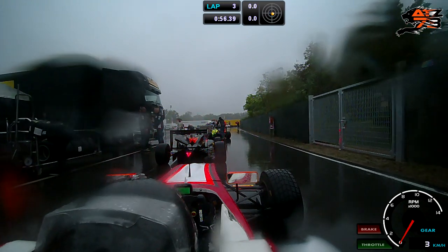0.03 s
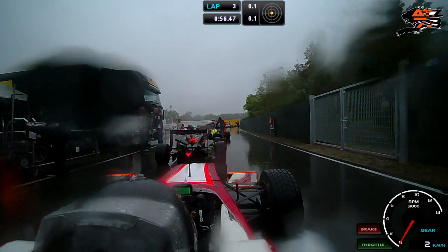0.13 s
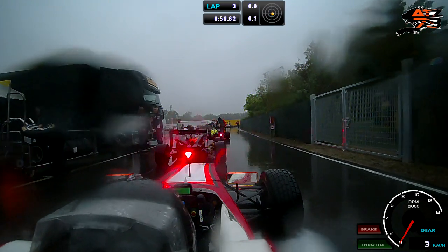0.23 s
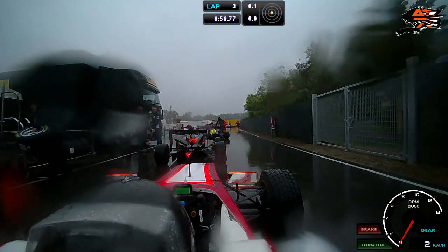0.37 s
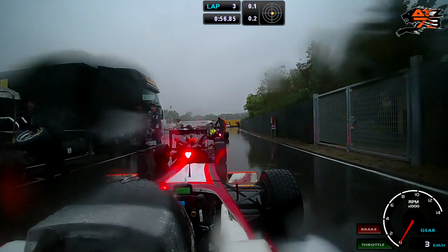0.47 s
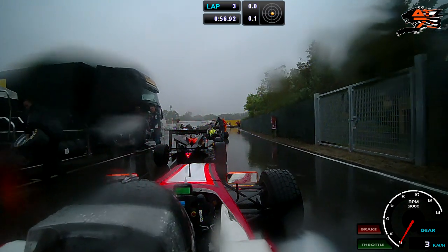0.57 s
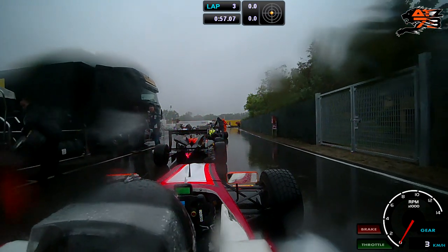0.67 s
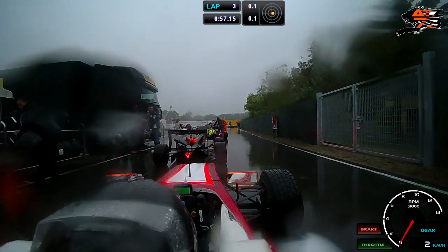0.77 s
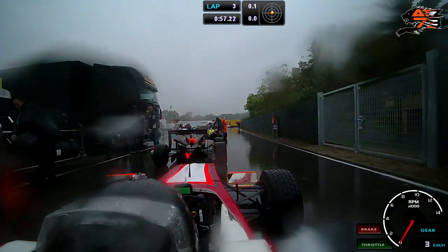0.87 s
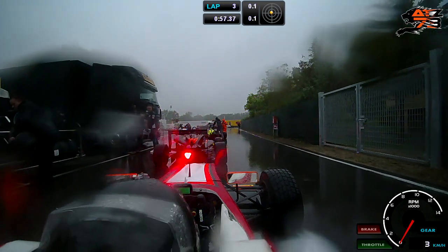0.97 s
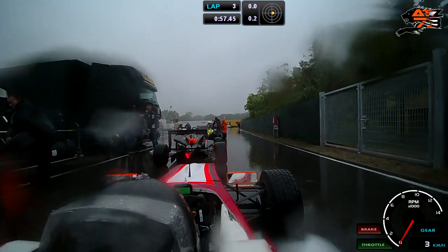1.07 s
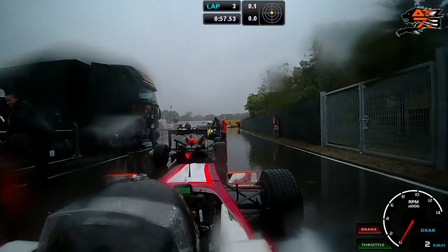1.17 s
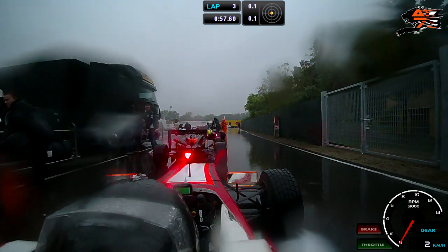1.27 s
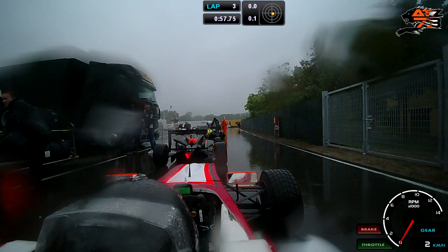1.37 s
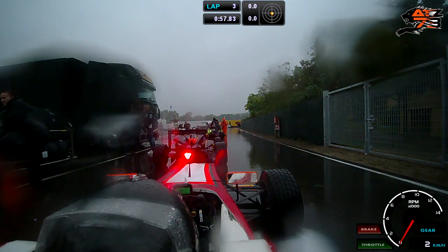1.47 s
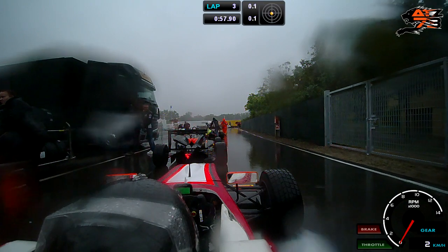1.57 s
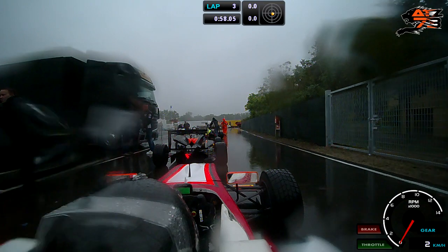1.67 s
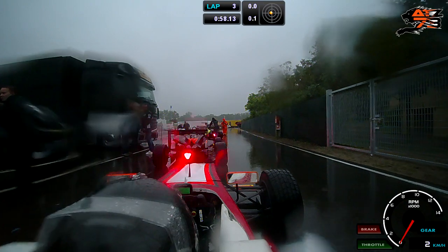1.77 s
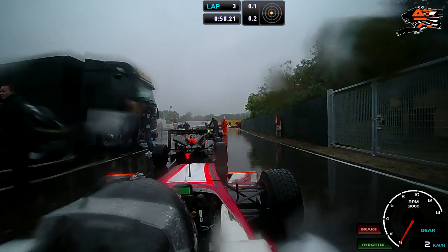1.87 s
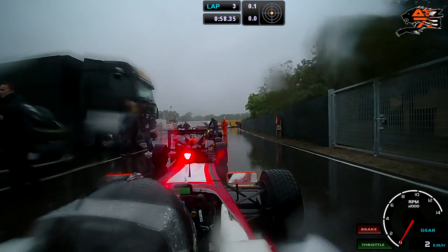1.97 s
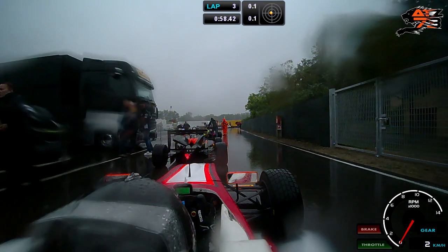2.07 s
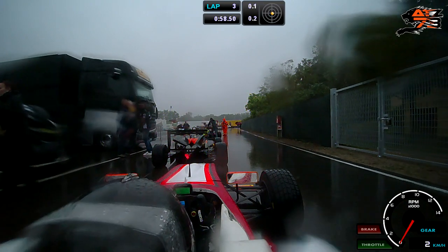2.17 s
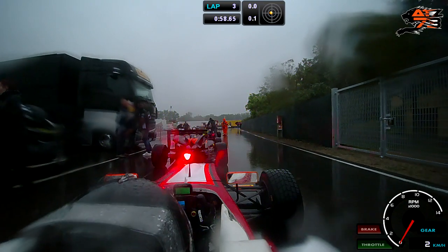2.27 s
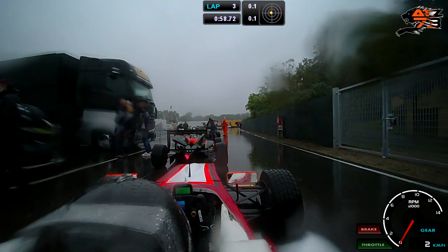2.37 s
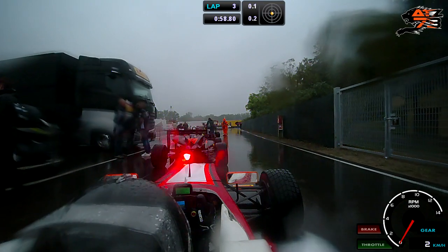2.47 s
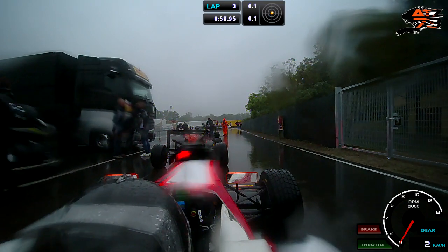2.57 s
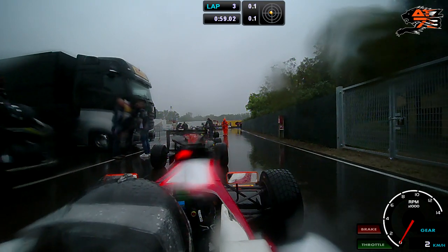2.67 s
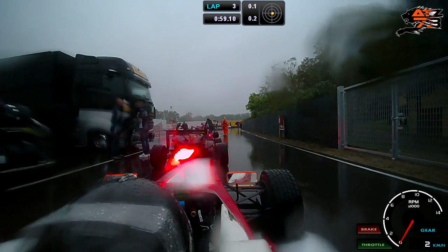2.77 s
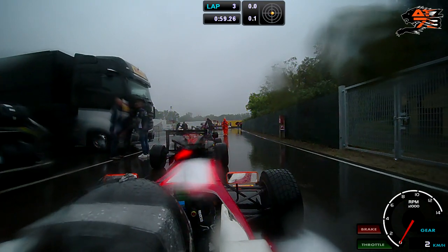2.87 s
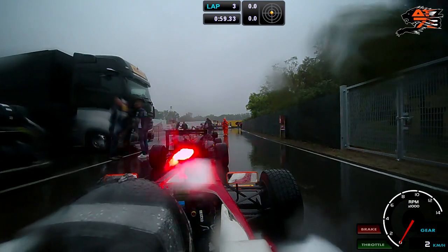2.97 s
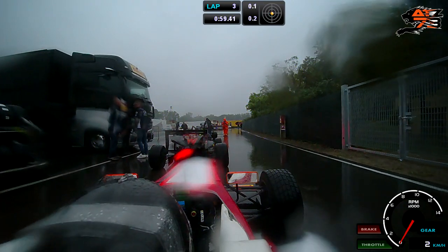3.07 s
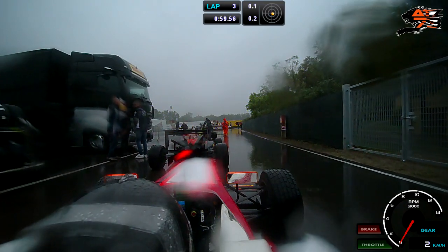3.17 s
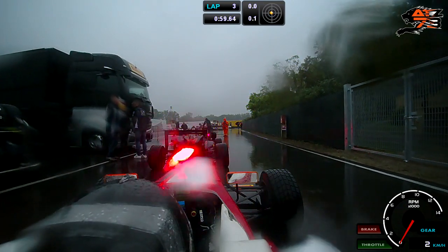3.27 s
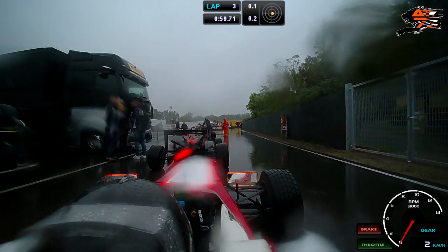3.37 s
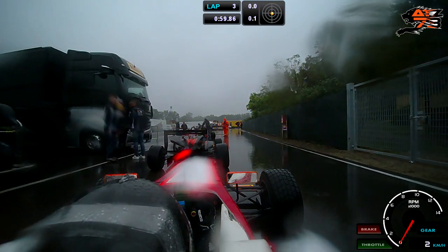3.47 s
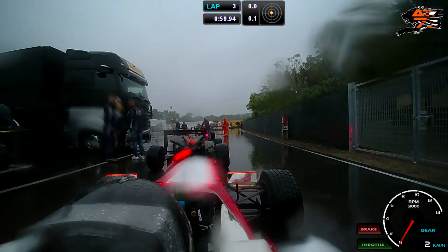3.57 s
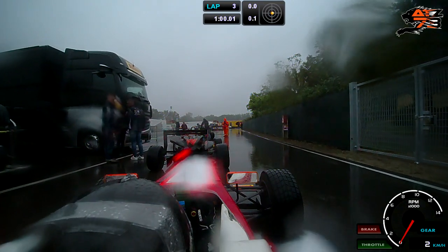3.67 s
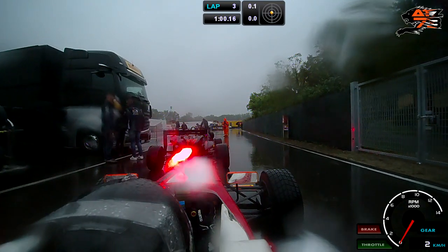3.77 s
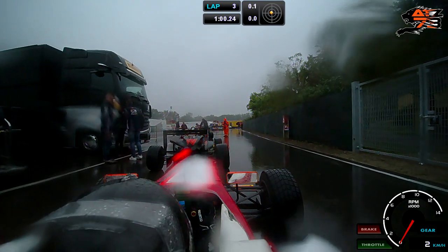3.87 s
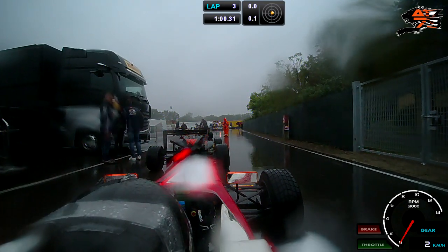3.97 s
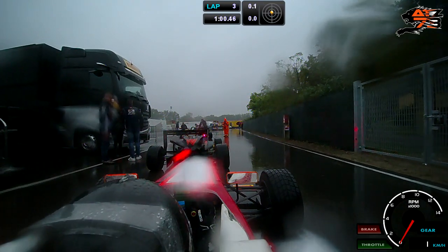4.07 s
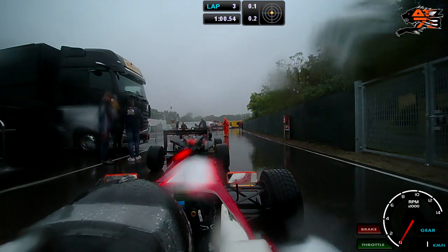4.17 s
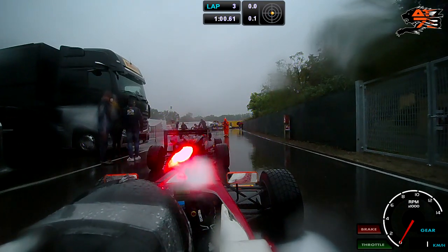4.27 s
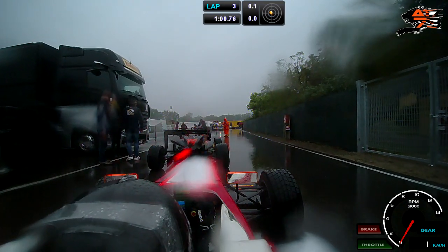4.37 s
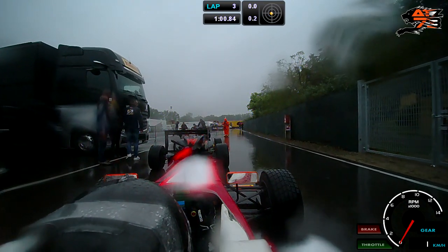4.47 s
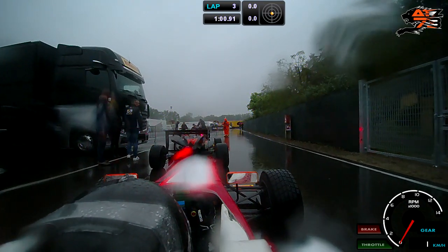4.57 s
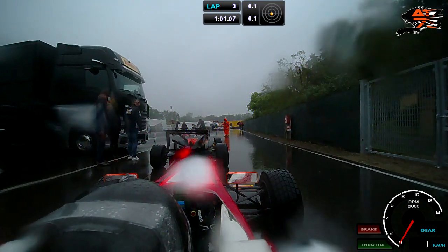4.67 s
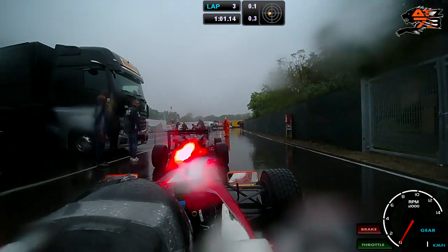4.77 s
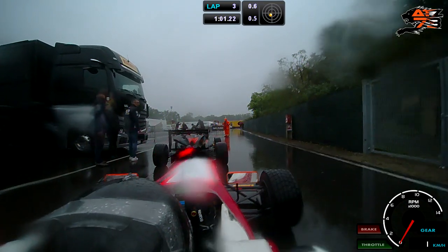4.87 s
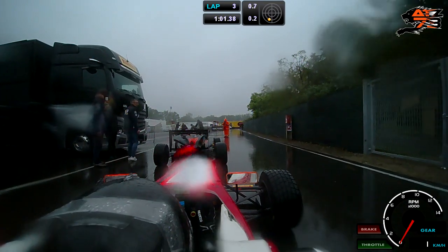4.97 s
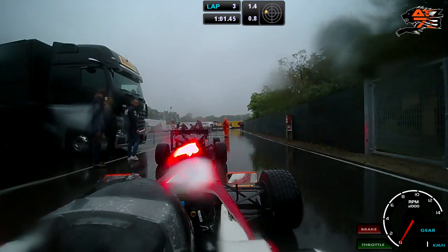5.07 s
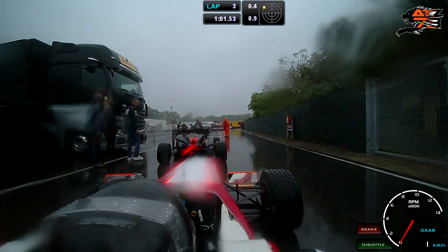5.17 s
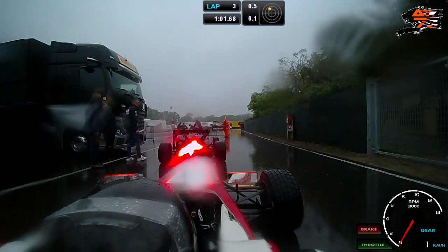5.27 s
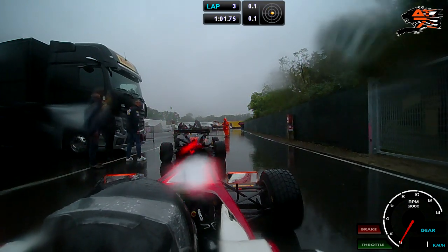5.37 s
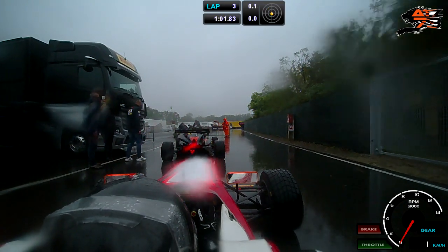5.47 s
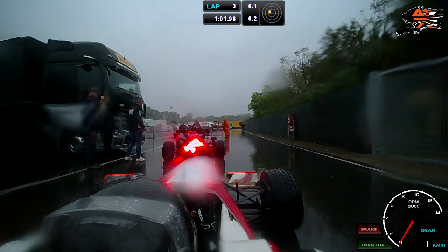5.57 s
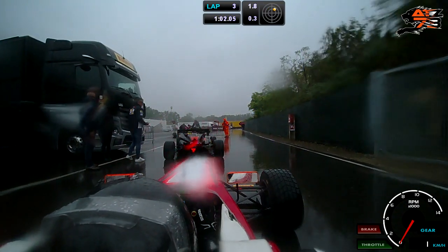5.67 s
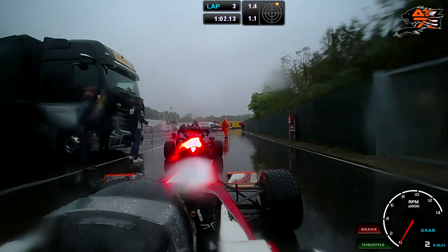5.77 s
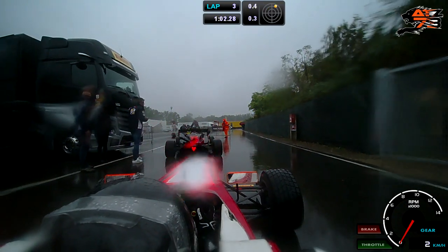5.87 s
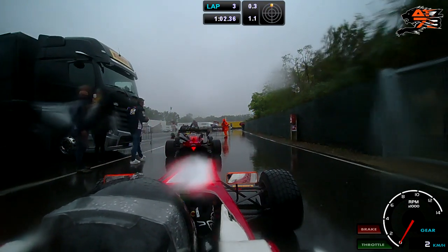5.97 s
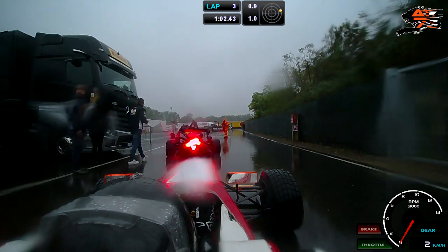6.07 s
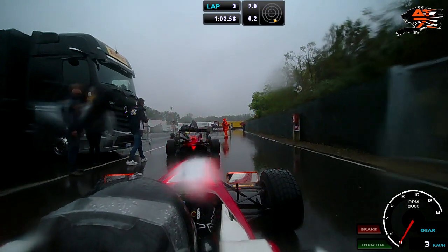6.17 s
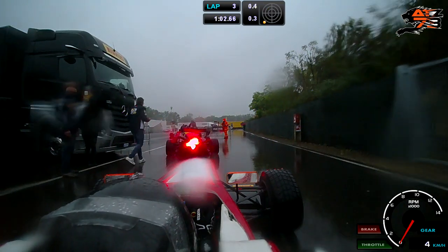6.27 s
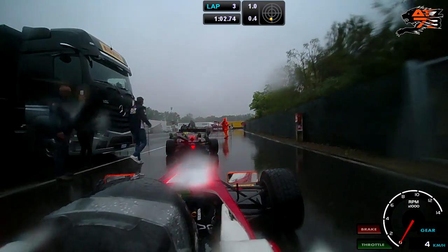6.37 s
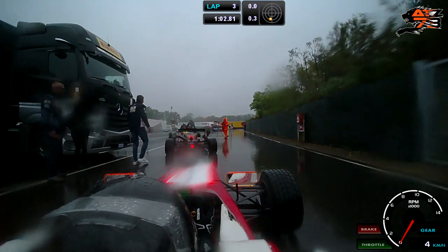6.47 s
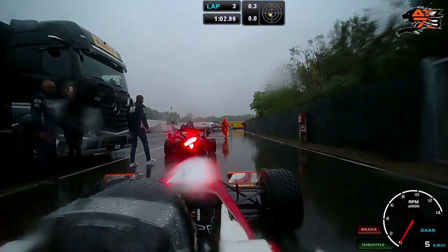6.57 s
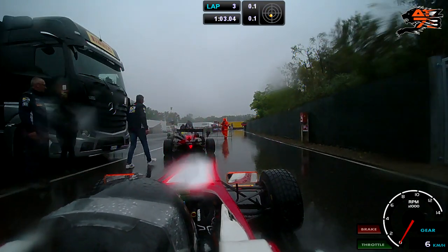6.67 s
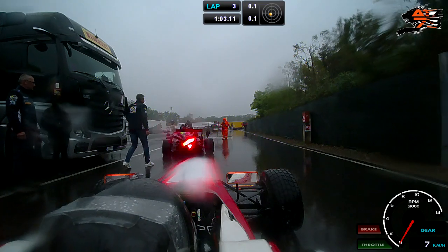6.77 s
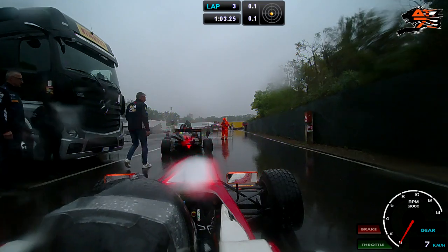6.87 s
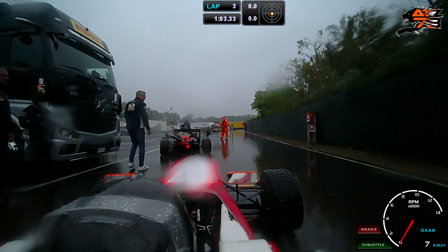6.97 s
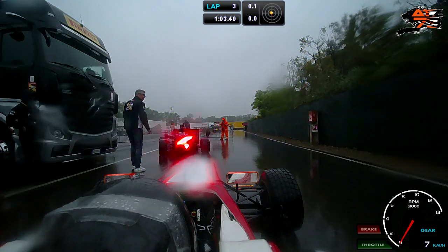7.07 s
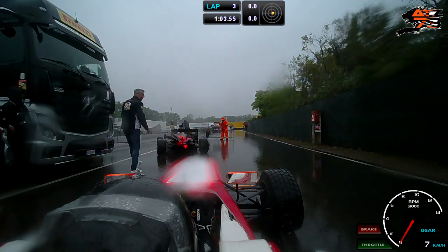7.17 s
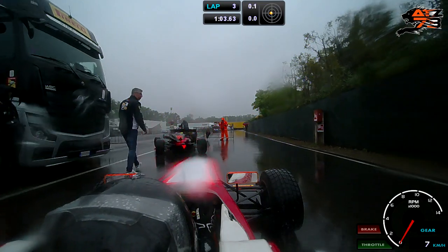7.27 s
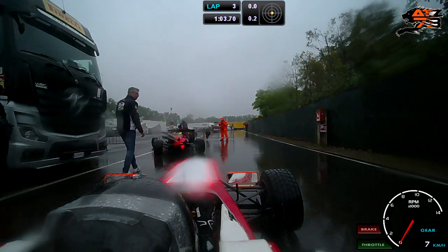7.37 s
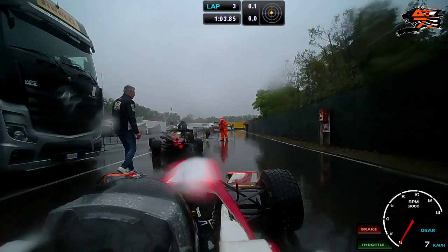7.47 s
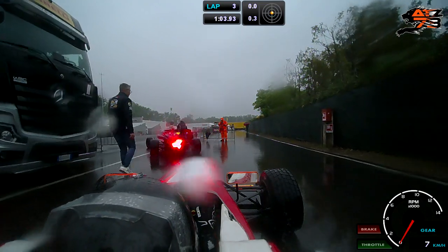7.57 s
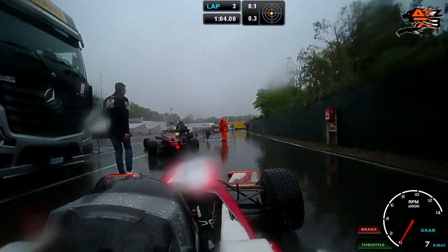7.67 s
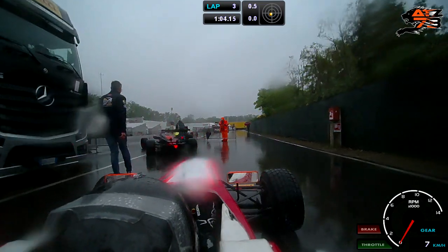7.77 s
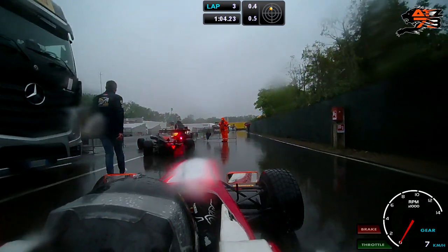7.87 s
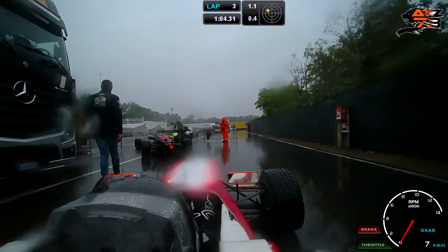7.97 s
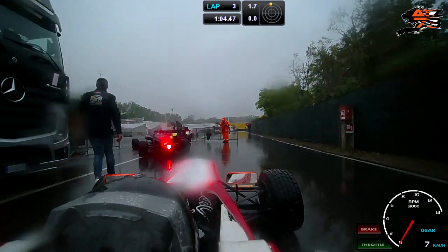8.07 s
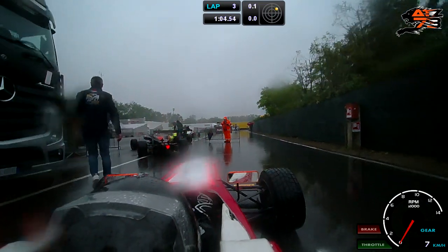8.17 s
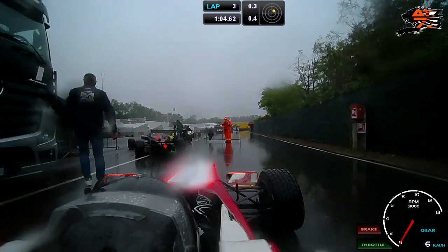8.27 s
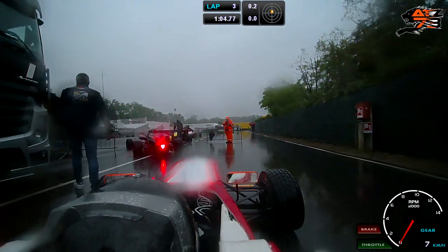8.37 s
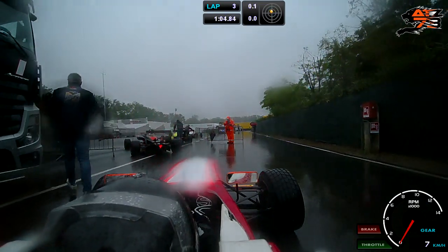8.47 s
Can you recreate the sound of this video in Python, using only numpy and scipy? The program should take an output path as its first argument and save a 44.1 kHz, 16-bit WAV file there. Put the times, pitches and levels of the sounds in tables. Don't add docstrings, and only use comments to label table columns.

```python
import sys
import numpy as np
from scipy import signal
from scipy.fft import rfft, irfft, next_fast_len
from scipy.io import wavfile
from scipy.ndimage import uniform_filter1d, map_coordinates

SR = 44100
rng = np.random.default_rng(int(sys.argv[2]) if len(sys.argv) > 2 else 0)


def digitize_waveform(pressure):
    field = np.atleast_2d(pressure).T
    bounded = np.clip(field, -1, 1)
    quanta = np.round(bounded * 32767).astype(np.int16)
    wavfile.write(sys.argv[1], SR, quanta)


def makeup_ratio(level_db):
    decades = np.asarray(level_db, float) / 20
    return 10 ** decades


N = 376173


def unit(x):
    return x / np.sqrt(np.mean(x ** 2) + 1e-20)


def curves(rows):
    seconds, *columns = np.transpose(rows)
    return [np.interp(np.arange(N) / SR, seconds, column) for column in columns]


def wobble(rate):
    at = np.arange(0, N + 32, 32)
    knots = rng.standard_normal(int(N * rate / SR) + 4)
    return np.interp(np.arange(N), at, map_coordinates(knots, [at * rate / SR]))


def filtered(x, spectrum=None, modes=(), base=1):
    size = next_fast_len(N + SR // 2)
    f = np.fft.rfftfreq(size, 1 / SR)
    gain = base
    for centre, width, db in modes:
        gain = gain + makeup_ratio(db) * 1j * f * width / (centre * centre - f * f + 1j * f * width)
    if spectrum:
        hz, db = np.transpose(spectrum)
        gain = gain * makeup_ratio(np.interp(np.log(f + 1), np.log(hz + 1), db))
    return irfft(rfft(x, size) * gain, size)[:N]


def shaped_noise(spectrum):
    return unit(filtered(rng.standard_normal(N), spectrum))


def firings(turns, scatter_db, odd_db):
    count = np.floor(turns).astype(int)
    size_db = scatter_db * np.clip(rng.standard_normal(N // 200), -3, 1.7)
    size_db = size_db + odd_db * (np.arange(N // 200) % 2)
    return makeup_ratio(size_db[count])


def gated(turns, depth, sharp, scatter_db, odd_db):
    burst = firings(turns, scatter_db, odd_db) * np.exp(-sharp * (turns % 1))
    return rng.standard_normal(N) * (1 + depth * unit(burst))


IDLE_HZ = 53.2
INERTIA_S = .05
# (time [s], firing rate [Hz], firing tone level [dB])
ENGINE_RUN = [(0, 53.17, -21), (4.4, 53.38, -20.5), (4.57, 59.4, -19), (4.7, 72.83, -7),
              (5.12, 102.7, -5.5), (5.36, 111.8, -7), (5.55, 111.5, -7), (5.72, 96.16, -5.5),
              (6.17, 97.46, -7), (6.36, 86.9, -7.5), (6.54, 66.8, -16), (6.95, 60.8, -16),
              (7.42, 58, -18.5), (7.61, 73.5, -6.5), (7.99, 98.9, -6), (8.13, 92.1, -7), (8.33, 54.8, -23),
              (8.53, 44.55, -40.5)]


def engine():
    hz, tone_db = curves(ENGINE_RUN)
    return uniform_filter1d(hz, size=round(INERTIA_S * SR)), tone_db


# (idle level [dB], full level [dB], rise over idle [Hz])
ORDER_GROWTH = [
    (-39, -34, 12),
    (-43.5, -30.5, 10.2),
    (-34.5, -38, 4.1),
    (-43.5, -42, 11),
    (-49.5, -42.5, 8),
]
# (centre [Hz], width [Hz], level [dB])
HEADER_BLOOMS = [(245, 24, 9), (430, 26, 8)]


def overtones():
    hz, first_db = engine()
    over_idle = np.maximum(hz - IDLE_HZ, 0)
    dying_db = .8 * np.minimum(first_db + 19, 0)
    levels = []
    for idle_db, full_db, rise_hz in ORDER_GROWTH:
        levels.append(full_db + (idle_db - full_db) * np.exp(-over_idle / abs(rise_hz)) + dying_db)
    for order, (centre, width, db) in enumerate(HEADER_BLOOMS, 4):
        levels[order - 1] = levels[order - 1] + db * np.exp(-((order * hz - centre) / width) ** 2)
    return levels


# (multiple, level under the 3rd order [dB])
FAINT_ORDERS = [(.5, -12), (2.5, -19), (3.5, -16), (4.5, -21), (6, -22), (7, -27), (8, -25), (9, -26),
                (10, -30), (11, -30)]
# (multiple, level [dB])
IDLE_ORDERS = [(2.5, -37), (5, -46), (7, -45), (9, -48)]
# (frequency [Hz], level [dB])
PIPE_COLOUR = [(20, 1), (130, -0.5), (168, 5), (192, 3), (220, 0), (290, 1.5), (480, 0), (1200, -1)]


def exhaust(turns):
    hz, first_db = engine()
    second_db, third_db, half_db, fourth_db, fifth_db = overtones()
    angle = 2 * np.pi * turns
    idle = np.clip((-15 - first_db) / 5, 0, 1)
    tone = makeup_ratio(first_db + 3 + (.45 + .8 * idle) * wobble(18)) * np.sin(angle + .1 * idle * wobble(8.8))
    upper = np.zeros(N)
    for order, db, phase in [(2, second_db, np.pi / 4), (3, third_db, -np.pi / 2)]:
        strength = makeup_ratio(db + 3.5 - 4 * idle + .8 * wobble(12))
        upper += strength * np.sin(order * angle + phase + .25 * wobble(6))
    lines = [(1.5, half_db - 6 * idle), (4, fourth_db), (5, fifth_db)]
    lines += [(order, third_db + db) for order, db in FAINT_ORDERS]
    lines += [(order, db - 3 * np.abs(hz - IDLE_HZ)) for order, db in IDLE_ORDERS]
    for order, db in lines:
        upper += makeup_ratio(db + 3 - 3 * idle + 2 * wobble(10)) * np.sin(order * angle + .35 * wobble(6))
    return tone + filtered(upper, PIPE_COLOUR)


# (time [s], effort over idle [dB])
THROTTLE_EFFORT = [(0, -0.5), (4.58, -0.5), (4.64, 4), (4.92, 2), (5.08, 7), (5.42, 7.5), (5.94, -3),
                   (6.2, 4), (6.36, -5), (6.67, -10.5), (6.72, 2.5), (7.39, .5), (7.68, 5.5), (7.9, 1.5),
                   (8.03, 5), (8.3, -2), (8.53, -5.5)]
# (idle level [dB], rise per effort [dB/dB], rise with speed [dB/octave])
SHAKEN_PARTS = [
    (-37, .5, 5),
    (-49, 0.55, 3.5),
    (-52.5, 0.8, -0.5),
    (-68, 0.17, 8),
    (-69.5, 0.04, 2),
]


def shaken():
    effort_db, octaves = curves(THROTTLE_EFFORT)[0], np.log2(engine()[0] / IDLE_HZ)
    return [db + by_effort * effort_db + by_speed * octaves for db, by_effort, by_speed in SHAKEN_PARTS]


# (frequency [Hz], level [dB per Hz])
RUMBLE_COLOUR = [(90, -39.5), (150, -1.5), (200, 0), (300, -1), (470, -4), (700, -11), (800, -12.5),
                 (1500, -20), (2200, -59.5), (4000, -120)]
# (centre [Hz], width [Hz], level [dB])
TUB_MODES = [(184.5, 9.2, 4), (211.3, 24.6, 10.5), (267.4, 16, 4.5), (362.8, 15, 8), (486, 85, 6.5),
             (611, 61, 1), (662.3, 4.7, 11.5)]
SHUDDER_HZ, SHUDDER_WIDTH_HZ, SHUDDER_DB = 81.3, 17, 4


def chassis(turns, load):
    rumble = unit(filtered(gated(turns, 0.54, 2.3, 2.5, 0.98), RUMBLE_COLOUR, TUB_MODES))
    calm = makeup_ratio(-7.5 * load)
    shudder_db = SHUDDER_DB * np.exp(-((engine()[0] - SHUDDER_HZ) / SHUDDER_WIDTH_HZ) ** 2)
    return makeup_ratio(shaken()[0] + shudder_db + 4.5) * calm * rumble


# (frequency [Hz], level [dB per Hz])
RATTLE_COLOUR = [(410, -34.5), (700, -4.5), (1470, -1), (1800, 1), (2430, -2), (3400, -15.5), (4420, -46.5),
                 (7480, -120)]
# (centre [Hz], width [Hz], level [dB])
LOOSE_PANELS = [(1020, 220, -5.5), (1960, 140, 1), (2534, 120, 1.5), (2810, 130, 4)]
# (centre [Hz], width [Hz], level [dB])
STRAINED_PANELS = [(1020, 260, 5.5), (1770, 120, 0.5), (1964, 84, 3), (2460, 280, 6), (2680, 81, 3)]


def panels(turns, load):
    shaking = gated(turns + .3, 0.44 + 0.11 * load, 3, 2.8, 0)
    loose = unit(filtered(shaking, RATTLE_COLOUR, LOOSE_PANELS))
    tight = unit(filtered(shaking, RATTLE_COLOUR, STRAINED_PANELS))
    return makeup_ratio(shaken()[1] + 1.5) * ((1 - load) * loose + load * tight)


# (frequency [Hz], level [dB per Hz])
FIZZ_COLOUR = [(1650, -27), (2800, -3), (3590, -7.5), (4200, -5), (4790, -9.5), (7000, -24.5),
               (9100, -51.5), (15400, -120)]
# (centre [Hz], width [Hz], level [dB])
CASING_MODES = [(3283, 89, 10.5), (3920, 660, 1.5), (5450, 110, 0.5)]


def drivetrain(turns, load):
    chatter = gated(turns + 0.55, 0.5 + 0.23 * load, 3, 3.6, -1.7)
    return makeup_ratio(shaken()[2] + 0.36) * unit(filtered(chatter, FIZZ_COLOUR, CASING_MODES))


# (frequency [Hz], level [dB per Hz])
HISS_COLOUR = [(2600, -32.5), (4500, -2.5), (6000, -3.5), (7400, -7), (8900, -3), (10500, -13.5),
               (12000, -22.5), (15500, -35.5), (20000, -79.5)]
# (centre [Hz], width [Hz], level [dB])
DUCT_MODES = [(6990, 180, 2.5), (7500, 120, 6), (10100, 170, -0.5)]


def intake(turns):
    gulps = gated(turns + 0.5, 0.54, 2.2, 3, -2)
    return makeup_ratio(shaken()[3] + 2.5) * unit(filtered(gulps, HISS_COLOUR, DUCT_MODES))


def bodywork(turns):
    load = np.clip((engine()[1] + 18) / 10, 0, 1)
    return chassis(turns, load) + panels(turns, load) + drivetrain(turns, load) + intake(turns)


# (centre [Hz], width [Hz], level [dB])
COVER_MODES = [(7470, 350, -7), (8720, 410, 10), (10100, 160, -12), (10500, 220, -14)]
# (time [s], level over the usual [dB], length [s])
SEATING_SPELLS = [
    (4.643, 4.5, .05),
    (4.848, 4, .25),
    (6.914, 7, 0.086),
    (7.39, 5, 0.061),
    (7.634, 8.5, .05),
    (7.696, 7.5, 0.017),
]


def valves(turns):
    seats = np.diff(np.floor(turns + .45), prepend=0) * firings(turns + .45, 2.1, -1.5)
    scrape = signal.fftconvolve(seats, np.hanning(110))[:N] * rng.standard_normal(N)
    colour = [(3000, -39.5), (6000, 1), (10000, -1), (14000, -14.5), (20000, -54.5)]  # (Hz, dB)
    ticks = unit(filtered(scrape, colour, COVER_MODES, base=.04))
    t = np.arange(N) / SR
    spells_db = sum(db * np.exp(-np.abs(t - s) / length) for s, db, length in SEATING_SPELLS)
    return makeup_ratio(shaken()[4] + spells_db + 1.6) * ticks


# (time [s], level [dB])
CLUTCH_SLIP = [
    (5.6, -75),
    (5.65, -45),
    (5.92, -46.5),
    (6, -52),
    (6.2, -47),
    (6.33, -75),
]
# (centre [Hz], width [Hz], level [dB])
HOUSING_MODES = [(1770, 70, 0), (3950, 160, -10)]


def clutch(turns):
    bites = gated(turns + .5, 1.5, 4, 1.3, -1.5)
    return makeup_ratio(curves(CLUTCH_SLIP)[0]) * unit(filtered(bites, modes=HOUSING_MODES, base=0))


# (time [s], peak level [dB], ring [Hz], decay t60 [s], thud level [dB])
LINKAGE_KNOCKS = [
    (.697, -22.5, 970, 0.049, 6),
    (1.077, -28, 925, 0.09, -10),
    (1.094, -30.5, 1090, 0.047, -4),
    (1.114, -33, 1100, 0.03, 11),
    (3.54, -24.5, 906, 0.02, 9),
    (3.988, -26.5, 994, 0.033, 2),
    (3.999, -23, 1020, 0.018, -3),
    (4.018, -30.5, 935, 0.059, 1),
]


def linkage():
    knocks, t = np.zeros(N + SR), np.arange(SR // 3) / SR
    partials = [(1, 0.5), (1.24, -6.5), (1.9, -10.5), (2.5, -14)]  # (multiple, dB)
    for s, db, hz, t60, thud_db in LINKAGE_KNOCKS:
        ring = sum(makeup_ratio(level) * np.sin(2 * np.pi * hz * k * t) for k, level in partials)
        blow = np.convolve(rng.standard_normal(len(t)), np.hanning(16) / 12, 'same')
        crack = makeup_ratio(-7 - 60 * t / .02) * blow
        thud = makeup_ratio(thud_db) * np.sin(2 * np.pi * 600 * t)
        envelope = makeup_ratio(db - 60 * t / t60) * (1 - np.exp(-t / 0.0015))
        knocks[round(s * SR):][:len(t)] += envelope * (ring + thud + crack)
    return knocks[:N]


# (time [s], level [dB], decay t60 [s])
AIR_PUFFS = [
    (.002, -51.5, 0.024),
    (3.429, -44, 0.096),
    (3.472, -48.5, .13),
    (3.52, -54, 0.15),
    (4.625, -53, .08),
]
# (frequency [Hz], level [dB per Hz])
AIR_COLOUR = [(1500, -29), (2500, -6.5), (4200, 1.5), (5800, -1.5), (8000, -8.5), (11000, -21),
              (15500, -23.5)]


def air_line():
    puffs, t = np.zeros(N + SR), np.arange(SR // 3) / SR
    for s, db, t60 in AIR_PUFFS:
        puffs[round(s * SR):][:len(t)] += makeup_ratio(db - 60 * (t / t60) ** 2) * (1 - np.exp(-t / 0.0018))
    return puffs[:N] * shaped_noise(AIR_COLOUR)


# (time [s], firing rate [Hz], tone level [dB])
AHEAD_RUN = [(0, 76.05, -34), (3.75, 76.7, -31.5), (3.95, 87.3, -23), (4.05, 94.7, -17.5),
             (4.12, 89.33, -29), (4.2, 92.2, -21.5), (4.5, 89.9, -23), (4.6, 93.5, -17), (4.76, 94, -60)]
# (multiple, level [dB])
AHEAD_OVERTONES = [(2, -15), (4, -20), (5.2, -19)]


def car_ahead():
    hz, tone_db = curves(AHEAD_RUN)
    angle = 2 * np.pi * np.cumsum(hz * (1 + 0.01249 * wobble(9))) / SR
    strength = makeup_ratio(tone_db + 2 + 3 * wobble(14))
    fading_db = .6 * np.minimum(tone_db + 24, 0)
    wave = np.sin(angle)
    for order, db in AHEAD_OVERTONES:
        wave += makeup_ratio(db + fading_db + 2 * wobble(7)) * np.sin(order * angle)
    return strength * wave


QUEUE_DB, DRONE_DROP_DB = -28, -3.5
# (frequency [Hz], level [dB per Hz])
QUEUE_COLOUR = [(44, -37.5), (56, -6), (65, 11.5), (85, 4), (105, 2), (130, 7.5), (140, 4.5), (152, -19),
                (200, -58.5), (400, -120)]


def queue():
    drone_db = QUEUE_DB + DRONE_DROP_DB * np.log2(engine()[0] / IDLE_HZ)
    return makeup_ratio(drone_db) * shaped_noise(QUEUE_COLOUR)


# (frequency [Hz], level [dB per Hz])
MIC_COLOUR = [(30, 0), (9000, 2.5), (12000, -3), (16000, -12.5)]


def microphone_noise():
    return makeup_ratio(-76) * shaped_noise(MIC_COLOUR)


def scene():
    turns = np.cumsum(engine()[0]) / SR
    own_car = exhaust(turns) + bodywork(turns) + valves(turns) + clutch(turns) + linkage() + air_line()
    return (own_car + car_ahead() + queue() + microphone_noise())[None]


# (start [s], end [s], share of crests, step level [dB])
LIMITER_CHATTER = [
    (4.73, 5.5, .3, -39),
    (4.73, 5.46, .07, -28),
    (5.46, 5.72, .25, -29),
    (5.72, 6.31, .42, -27.5),
    (6.31, 7.5, .3, -40),
    (7.58, 8.24, .35, -41),
    (7.9, 8.0, .12, -29),
]


def cuts(x):
    crests = signal.find_peaks(np.abs(uniform_filter1d(x, size=80)), distance=SR // 300)[0]
    luck, shift, small = rng.random((3, N // 100 + 1))[:, crests // 100]
    steps = np.zeros(N)
    for start, end, share, db in LIMITER_CHATTER:
        hit = (crests > start * SR) & (crests < end * SR) & (luck < share)
        at = crests[hit] + np.round(90 * (shift[hit] - .5)).astype(int)
        steps[at] = -np.sign(x[at]) * makeup_ratio(db + 2 * np.log(small[hit] + 1e-3))
    return steps


def top_cut(x):
    return signal.sosfilt(signal.butter(12, 15750, fs=SR, output="sos"), x)


OVERLOAD = .708


def record(dry):
    recover = np.exp(-np.arange(SR // 50) / SR / 0.0053)
    clicks = signal.fftconvolve(cuts(dry[0]), recover)[:N]
    limited = np.clip(dry, -OVERLOAD, OVERLOAD) + clicks
    return top_cut(np.clip(limited, -OVERLOAD, OVERLOAD))


dry = scene()
out = record(dry)
digitize_waveform(out)
```